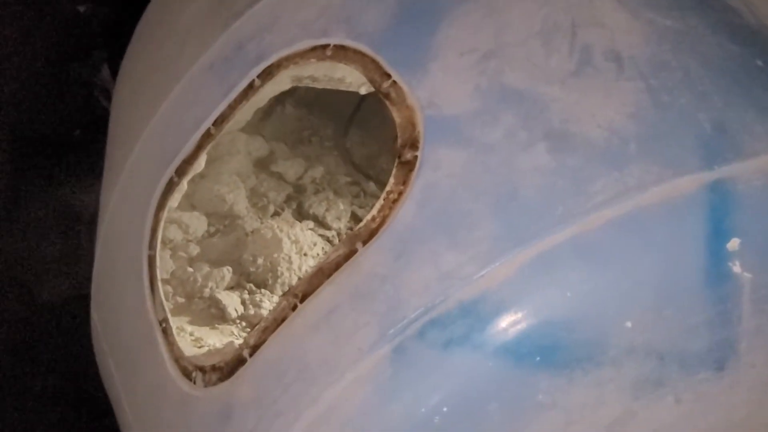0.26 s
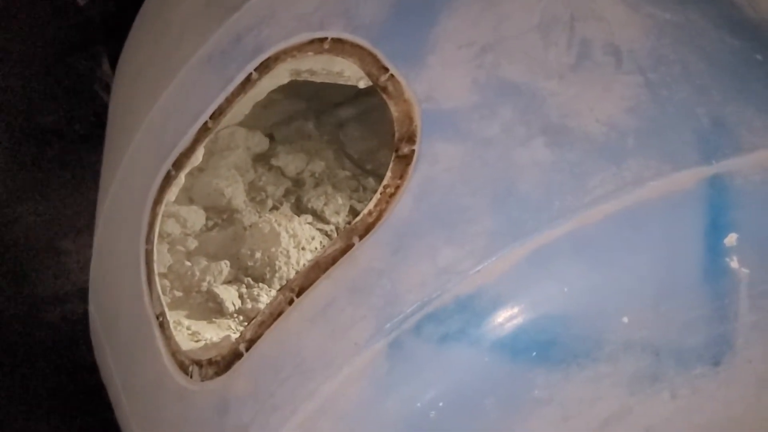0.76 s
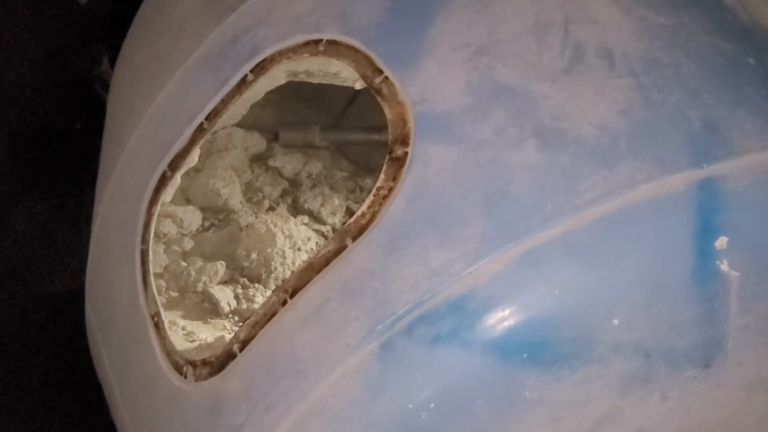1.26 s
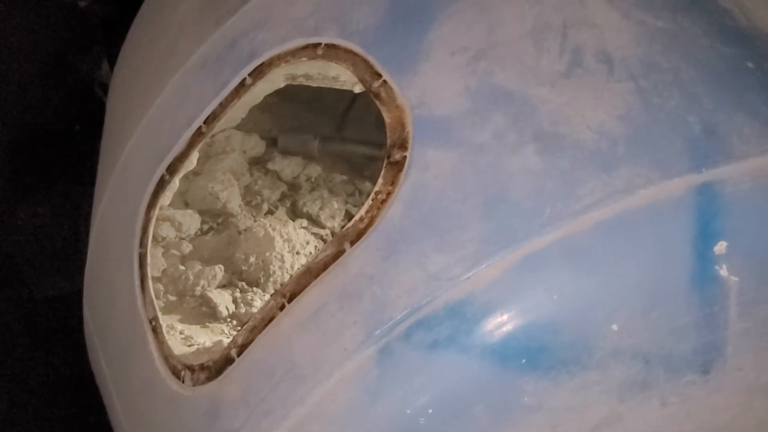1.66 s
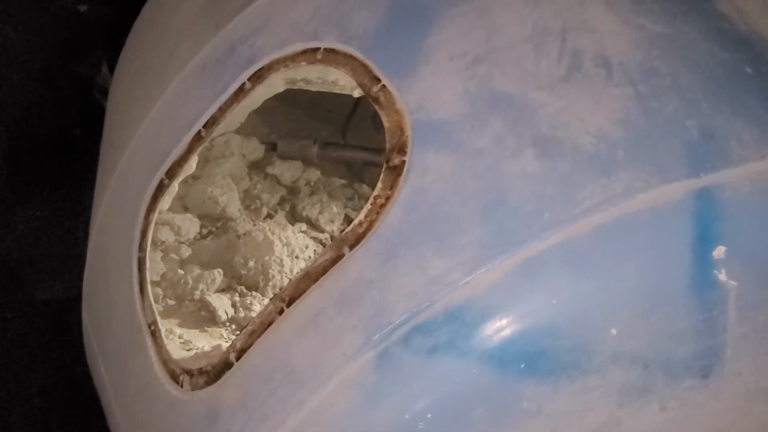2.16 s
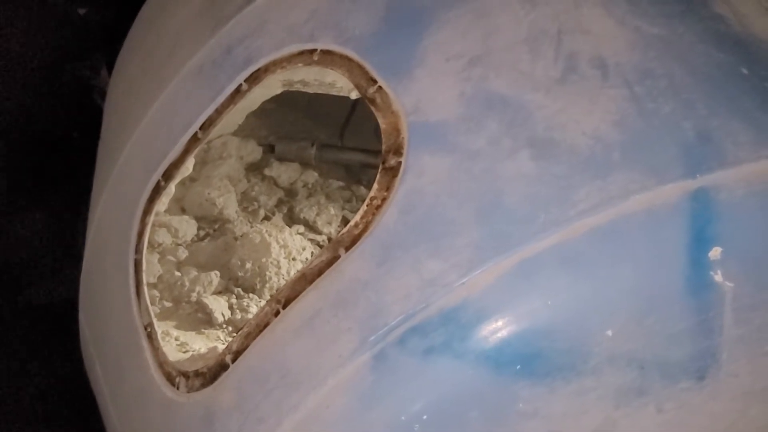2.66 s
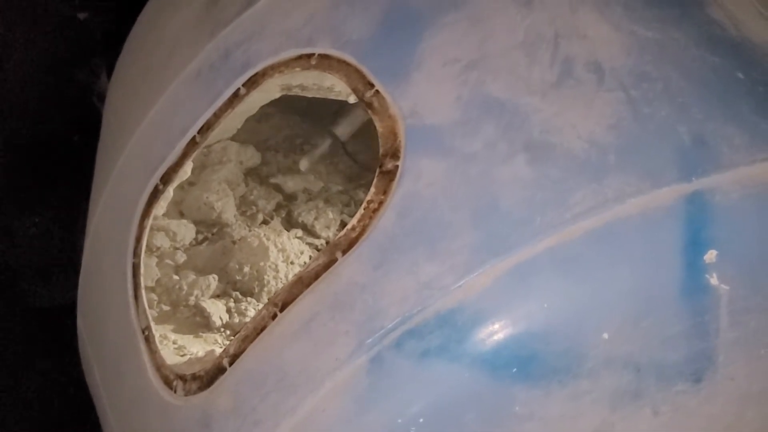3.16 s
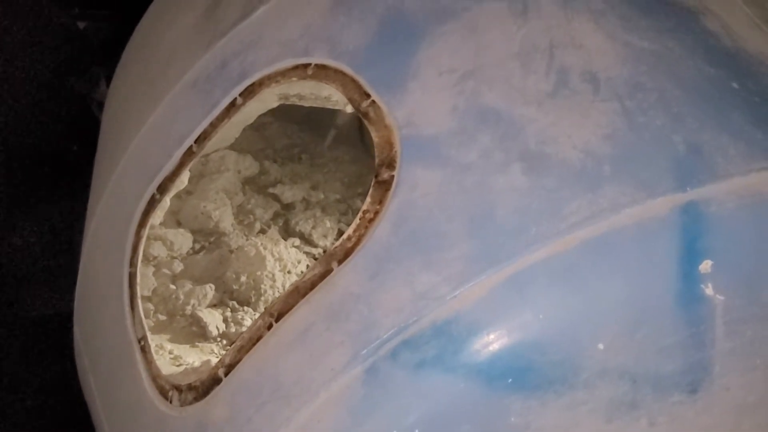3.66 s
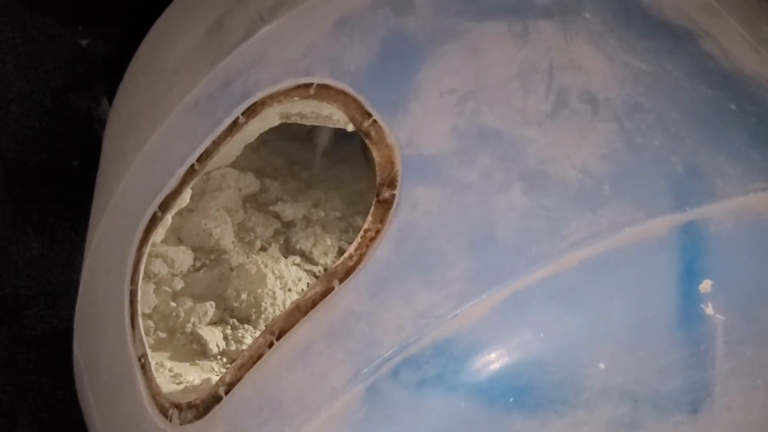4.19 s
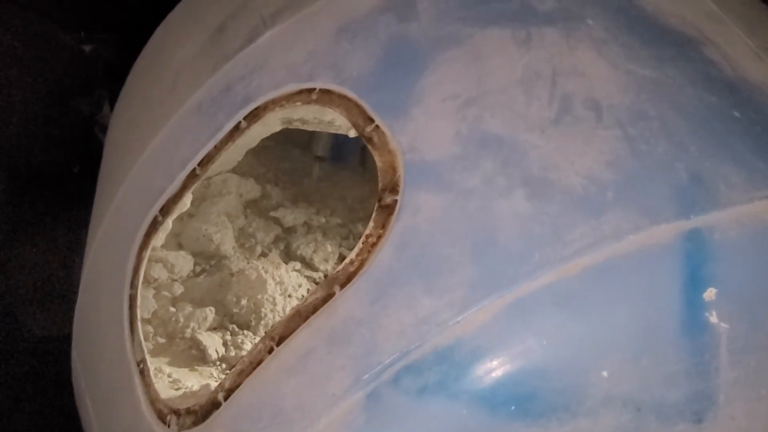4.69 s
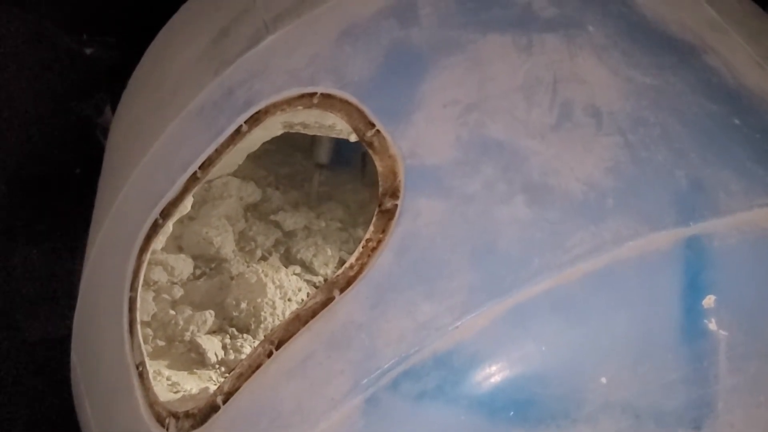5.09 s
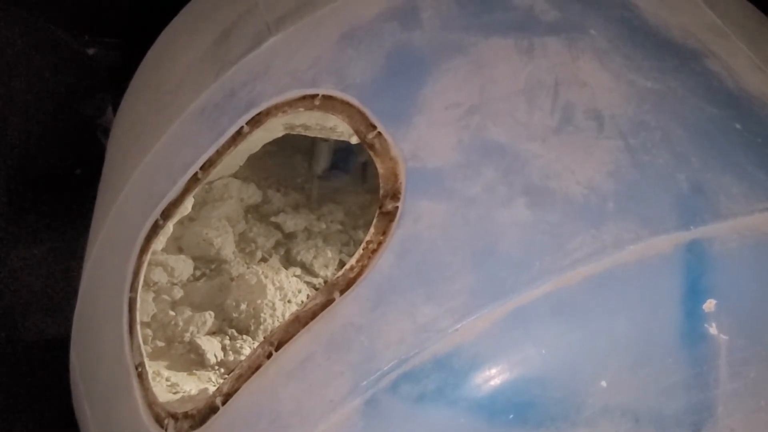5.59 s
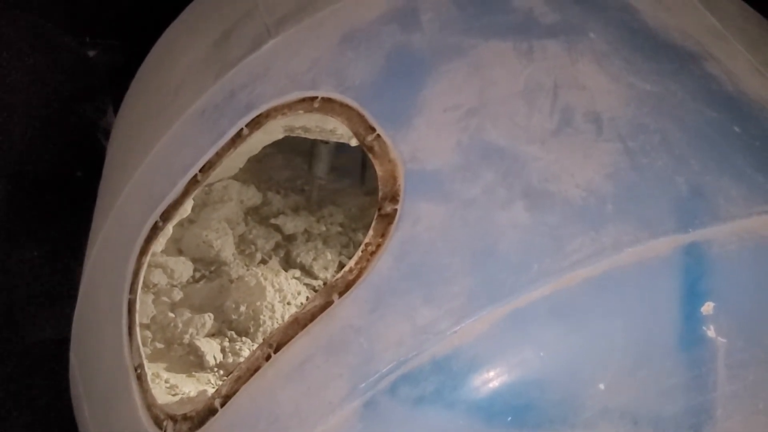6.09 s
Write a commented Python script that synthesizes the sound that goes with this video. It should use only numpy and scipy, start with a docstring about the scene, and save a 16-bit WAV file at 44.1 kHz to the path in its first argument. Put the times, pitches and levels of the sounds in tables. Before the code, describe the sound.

Close outside the opening of a hollow steel drum: sharp concrete cracks at about thirteen a second, bright chisel ringing, low drum boom and rushing exhaust air. The opening burst ends quickly, leaving engine rumble, hiss and a few light clacks. A scraping squawk leads into a long hammering run, then a short pause with falling bits, and hammering restarts right at the end.

```python
"""A pneumatic jackhammer chips hardened concrete in a mixer truck's steel drum, heard outside the hatch.
A run of blows is ending: each cracks and rings the chisel, the drum air booms, exhaust air rushes between.
Engine hum, rumble and a background hiss are low while the hammer works and swell slowly in the pauses.
The chisel skids with two short squawks into a long run at about thirteen blows a second; chips tick.
After another pause a third run begins. Impacts are coloured noise bursts; rings and booms decaying modes."""
import sys
import numpy as np
from scipy import signal
from scipy.fft import rfft, irfft, next_fast_len
from scipy.io import wavfile

SR = 44100
rng = np.random.default_rng(int(sys.argv[2]) if len(sys.argv) > 2 else 0)


def file_out(sig):
    """Save sig as 16-bit WAV at sys.argv[1]."""
    # one column per channel
    cols = np.atleast_2d(sig).T
    # limit, then scale
    lim = np.clip(cols, -1, 1)
    pcm = np.round(lim * 32767).astype(np.int16)
    wavfile.write(sys.argv[1], SR, pcm)


N = 279594
TIME = np.arange(N) / SR
RIGHT_LAG_S = 3 / SR   # sound from the hatch reaches the left side first

# hammer blows: start_s, force_db, sharpness (0 lingering crack, 1 short snap), chisel_ring_db
BLOWS = [(0.0455, 1, 0.85, -16.5), (0.114, 0, 0.87, -16), (0.191, -1.5, 0.89, -16.5), (0.2683, 1, 0.7, -13),
         (0.3391, -0.5, 0.93, -19), (0.4167, 0.5, 0.56, -11.5), (0.4953, -1.5, 0.81, -35),
         (2.7151, 0, 0.82, -24), (2.786, 1, .17, -15), (2.8531, 1.5, 0.52, -13), (2.921, 1, .65, -11.5),
         (2.993, 2, 0.74, -12), (3.0698, 2, 0.51, -15), (3.1414, 1, 0.18, -18.5), (3.207, 2, 0.57, -15),
         (3.2753, 0, .42, -17), (3.3444, -1.5, .1, -22), (3.4096, 1, 0.15, -23), (3.4753, 1, 0.26, -10.5),
         (3.5532, -0.5, 0.25, -23), (3.6155, 3.5, 0.42, -23), (3.68, 0.5, 0.57, -22),
         (3.757, -2.5, 0.83, -20), (3.8373, 2.5, 0.72, -14.5), (3.908, -9.5, .8, -21.5),
         (3.992, -2.5, 0.81, -25), (4.072, 0.5, 0.76, -18), (4.151, 2, 0.52, -15),
         (4.2239, -1.5, 0.73, -26), (4.2974, -1, 0.66, -22), (4.3765, -0.5, .65, -11.5),
         (4.4534, .5, 0.79, -25), (4.53, -.5, 0.91, -24), (4.6071, -.5, .3, -20), (4.6848, -1, 0.3, -27),
         (4.7606, 0, 0.39, -24), (4.8385, 0.5, 0.46, -36), (4.9165, 1, 0.33, -24), (4.9947, 1, 0.78, -24),
         (5.0704, 0, 0.47, -35), (5.1463, -0.5, 0.89, -28), (5.224, -2, .3, -35), (5.3002, .5, .5, -27),
         (5.3776, 1, 0.83, -26), (6.1762, -4.5, .64, -19.5), (6.2571, 1.5, 0.63, -13), (6.3324, 1, .2, -40)]
# how firmly the tip is bedded: time_s, bedded (0-1)
BEDDING = [(0, 0.17), (2.9, 0.6), (3.3, 0.3), (3.702, 0.52), (3.999, 1), (6.298, 1)]
# how much the concrete crumbles, as the level of its chips: time_s, level_db
CRUMBLING = [(0, -36), (2.7, -29), (3.7, -43), (4.35, -38), (4.8, -28.5), (6.34, -32)]
# chisel modes: freq_hz, loose_tip_db, bedded_tip_db, t60_s
CHISEL_MODES = [(4270, -3, -6, .2), (6265, -4, -8, .18), (7855, 3, 3, .17), (9695, -14, -.5, .22),
                (10015, -1, -14, .18), (10700, -10, -9, .13), (12010, -6, -2, .19), (12290, -3.5, -10, .18),
                (12800, -9, -11, .15), (14020, -15, -18, .15), (14440, -15, -19, .18),
                (15385, -12, -15, .14)]


def from_db(db):
    """Decibels to gain."""
    return 10 ** (np.asarray(db) / 20)


def to_db(gain):
    """A share of 0-1 to decibels, floored at -60 dB."""
    return 20 * np.log10(np.clip(gain, 1e-3, 1))


def decay(t, t60_s):
    """Exponential decay by 60 dB in t60_s."""
    return np.exp(-np.log(1000) * t / t60_s)


def rms_one(x):
    """Scale to rms 1."""
    return x / np.sqrt(np.mean(np.abs(x) ** 2) + 1e-20)


def in_time(rows, t=TIME):
    """The columns of a curve, read at times t."""
    s, *columns = np.transpose(rows)
    return [np.interp(t, s, c) for c in columns]


def at_hz(points, hz):
    """A spectrum read on a log-frequency axis."""
    point_hz, values = np.array(points)[:, 0], np.array(points)[:, 1]
    return np.interp(np.log(hz + 1), np.log(point_hz), values)


def add(out, sound, s):
    """Mix a stereo sound in at time s."""
    start = max(round(s * SR), 0)
    part = sound[:, :max(N - start, 0)]
    out[:, start:start + part.shape[1]] += part


def wander(width_hz, size):
    """Slow complex noise scaled to rms 1: the amplitude and phase of an unsteady tone."""
    steps = np.arange(0, size + 32, 32)
    hz = np.fft.fftfreq(len(steps), steps[1] / SR)
    draw = rng.standard_normal(len(hz)) + 1j * rng.standard_normal(len(hz))
    slow = rms_one(np.fft.ifft(draw / (1 + (hz / width_hz) ** 2)))
    return np.interp(np.arange(size), steps, slow)


def noise(spectrum, size=N, lag_s=RIGHT_LAG_S):
    """Coloured stereo noise of rms 1; a positive lag delays the right side."""
    # left-right likeness: freq_hz, likeness (0-1)
    likeness = [(40, 0.35), (180, 1), (350, 0.33), (1000, 0.5), (3000, 0.77), (5000, 0.56), (9000, 0.11),
                (15000, 0)]
    length = next_fast_len(size)
    hz = np.fft.rfftfreq(length, 1 / SR)
    mid, side = rfft(rng.standard_normal((2, length)))
    alike = np.clip(at_hz(likeness, hz), 0, 1)
    sides = np.sqrt(1 + alike) * mid + np.sqrt(1 - alike) * side * [[1], [-1]]
    sides[1] *= np.exp(-2j * np.pi * hz * lag_s)
    colour = from_db(at_hz(spectrum, hz)) * (hz > 20)
    return rms_one(irfft(sides * colour, length)[:, :size])


def trigger():
    """At every moment: seconds since the last press, seconds of pause so far, run's surge and hiss level."""
    # trigger held: pressed_s, released_s, first_air_surge_db, low_hiss_db
    runs = np.array([(-.5, .51, -4, -59.5), (2.626, 5.41, 9, -57.5), (6.094, 6.5, 7.5, -65)])
    pressed, released, surge_db, low_hiss_db = runs[np.searchsorted(runs[:, 0], TIME) - 1].T
    return TIME - pressed, np.maximum(TIME - released, 0), surge_db, low_hiss_db


def unsteady_tone(hz, waver, width_hz):
    """A line of rms 1 whose level and phase waver."""
    tone = np.exp(2j * np.pi * (hz * TIME + rng.random()))
    return rms_one((tone * (1 + waver * wander(width_hz, N))).real)


def whistle(hz, width_hz):
    """A narrow band of noise of rms 1, partly alike on the two sides."""
    tone, common = np.exp(2j * np.pi * hz * TIME), wander(width_hz, N)
    return rms_one(np.array([(tone * (common + 3.0 * wander(width_hz, N))).real for _ in range(2)]))


def engine_hum(swell_db, follows=0.12):
    """Wavering engine lines that follow a small share of the swell."""
    # engine tones: freq_hz, level_db
    engine_tones = [(54, -32.5), (86, -43.5), (112, -44.5), (226, -43), (253, -48), (355, -47), (533, -57),
                    (673, -58)]
    hum = sum(from_db(db) * unsteady_tone(hz, waver=0.51, width_hz=4.6) for hz, db in engine_tones)
    return hum * from_db(follows * (swell_db - swell_db.max()))


def background_hiss(pan_db=1.5):
    """A background hiss, stronger on the right, with faint narrow-band whistles."""
    # hiss spectrum: freq_hz, density_db_per_hz
    hiss_colour = [(300, -4), (1400, 11), (3000, 3), (5000, 2), (7300, -4), (9500, 1), (11700, 4.5),
                   (13500, -1.5), (15800, -3.5)]
    # whistles: freq_hz, width_hz, level_db
    whistles = [(691, 68, -5.5), (1229, 36, -11), (1370, 27, -11.5), (1510, 9.8, -17), (1957, 10, -12),
                (3010, 69, -13.5)]
    hiss = noise(hiss_colour, lag_s=-0.000296) * from_db(pan_db * np.array([[-1], [1]]))
    return hiss + sum(from_db(db) * whistle(hz, width_hz) for hz, width_hz, db in whistles)


def low_rumble(swell_db, pause_s):
    """Engine rumble swells in the pauses; the drum's own rumble dies away after each run."""
    # rumble spectrum: freq_hz, density_db_per_hz
    rumble_colour = [(15, -52), (25, -22), (36, 1), (58, -8), (173, -11.5), (190, -11), (214, -7.5),
                     (284, -12), (342, -4.5), (385, -18), (678, -17), (922, -24), (2010, -29.5),
                     (7000, -54), (9100, -78), (15400, -120)]
    lowest_engine_db, engine_follows = -43, 0.46
    drum_db, drum_fall_db_per_s = -34, 40
    engine_gain = from_db(lowest_engine_db + engine_follows * swell_db)
    drum_gain = from_db(drum_db - drum_fall_db_per_s * pause_s)
    return np.hypot(engine_gain, drum_gain) * noise(rumble_colour, lag_s=-0.00031)


def background():
    """Hum, rumble and hiss; a swell, low while the hammer works, grows with the log of each pause."""
    swell_db_per_doubling, first_step_s, smoothing_s = 4.5, 0.09, 0.026
    _, pause_s, _, low_hiss_db = trigger()
    lag = np.exp(-1 / (smoothing_s * SR))
    target_db = swell_db_per_doubling * np.log2(1 + pause_s / first_step_s)
    swell_db = signal.lfilter([1 - lag], [1, -lag], target_db)
    hum = engine_hum(swell_db)
    hiss = from_db(low_hiss_db + swell_db) * background_hiss()
    return (hum + hiss + low_rumble(swell_db, pause_s)) * from_db([[-.7], [.7]])


def exhaust(puff_db=2.0, flutter_db=2.5, flutter_hz=70.0):
    """Spent air surges near each trigger press, then rushes in fluttering puffs between blows until release."""
    # air spectrum: freq_hz, density_db_per_hz
    air_colour = [(30, -9), (60, 27.5), (140, 5.5), (250, 12.5), (400, 5.5), (700, 9.5), (1100, -1.5),
                  (1900, -4.5), (3200, 1), (4400, -1.5), (7000, -7.5), (9000, 2.5), (12000, 4), (15800, -3)]
    steady_db, valve_open_s, shut_db_per_s = -30.5, .014, 470
    surge_at_s, surge_length_s = 0.088, 0.064
    dust_follows = 0.27   # blown dust adds to the rush, dB per dB of crumbling
    s = np.array(BLOWS)[:, 0]
    stroke = np.interp(TIME, s, np.arange(len(s)))
    held_s, pause_s, surge_db, _ = trigger()
    crumbling_db, = in_time(CRUMBLING)
    surge = surge_db * np.exp(-((held_s - surge_at_s) / surge_length_s) ** 2)
    flow_db = steady_db + surge - shut_db_per_s * pause_s
    dust_db = dust_follows * (crumbling_db - crumbling_db.mean())
    puffs_db = puff_db * np.sin(2 * np.pi * stroke) + flutter_db * wander(flutter_hz, N).real
    valve = np.minimum(held_s / valve_open_s, 1)
    return valve * from_db(flow_db + dust_db + puffs_db) * noise(air_colour)


def chips(scatter_db=3.5, t60_s=0.035, size=3000):
    """Broken bits tick at random about the drum; after each run they thin out and land more softly."""
    # chip spectrum: freq_hz, density_db_per_hz
    chip_colour = [(300, -9), (1500, -5), (2400, -8), (3300, 5), (4500, 4.5), (6000, 5), (9000, -7),
                   (15800, -27)]
    chips_per_s, settle_s, settled_db, soften_s = 81, .2, -19.5, 0.04
    pause_s = trigger()[1]
    per_s = chips_per_s * np.exp(-pause_s / settle_s)
    db = in_time(CRUMBLING)[0] + settled_db * (1 - np.exp(-pause_s / soften_s))
    out, fade = np.zeros((2, N)), decay(TIME[:size], t60_s)
    for i in np.flatnonzero(rng.random(N) < per_s / SR):
        tick = noise(chip_colour, size=size) * fade
        add(out, tick * from_db(db[i] + scatter_db * rng.standard_normal()), i / SR)
    return out


def skid(rough_hz=70, fade_db=-8.5):
    """The tip slips over the concrete: a rough, fading squawk whose pitch sags midway."""
    # squawks: start_s, length_s, pitch_hz, sag_hz, level_db
    skids = [(2.67, 0.042, 1410, 50, -28), (2.707, 0.084, 825, 151, -18)]
    out = 0
    for s, length_s, hz, sag_hz, db in skids:
        slip = np.clip((TIME - s) / length_s, 0, 1)
        grip = 4 * slip * (1 - slip)
        tone = np.exp(2j * np.pi * np.cumsum(hz - sag_hz * grip) / SR)
        rough = np.array([0.31 + wander(rough_hz, N) for _ in range(2)])
        out = out + from_db(db + fade_db * slip) * np.sqrt(grip) * (tone * rough).real
    return out


def drum_boom(strokes, levels_db, modes, scatter_db, delay_s):
    """Each stroke puffs into the drum, whose low modes ring on into the next stroke."""
    bedded = in_time(BEDDING, strokes)[0]
    at, out = np.clip(((strokes + delay_s) * SR).astype(int), 0, N - 1), 0
    for hz, loose_db, bedded_db, t60 in modes:
        puffs = np.zeros(N) + 1e-18
        mode_db = loose_db + bedded * (bedded_db - loose_db)
        puffs[at] = from_db(levels_db + mode_db + scatter_db * rng.standard_normal(len(at)))
        r, w = decay(1 / SR, t60), 2 * np.pi * hz / SR
        rung = signal.lfilter([0, np.sin(w)], [1, -2 * r * np.cos(w), r * r], puffs)
        # a mode takes a few cycles to build up
        build_up = signal.butter(1, [hz * .75, hz / .75], "band", fs=SR, output="sos")
        out = out + signal.sosfilt(build_up, rung)
    return out


def drum_air(s):
    """The drum's air modes boom and its deep modes thud under the blows."""
    # air modes: freq_hz, loose_tip_db, bedded_tip_db, t60_s
    air_modes = [(107.7, -1, 4, 0.42), (169.23, -1, -1, 0.79), (210, 1, -9, 0.34), (234.3, -16, 0, 0.35),
                 (275.5, -12, -14, 0.27), (339, -5.5, -10.5, .2), (374.5, -24, -12, 0.19)]
    # deep modes: freq_hz, loose_tip_db, bedded_tip_db, t60_s
    deep_modes = [(49.75, 3.5, 1, 0.59), (74.9, 5.5, -9, 0.23)]
    # levels in the drum: time_s, boom_db, thud_db
    boom_levels = [(0, -25, -23), (.4, -24.5, -28), (2.7, -30, -29), (3.05, -27.5, -20), (3.35, -22, -18.5),
                   (4.2, -22, -22), (5.35, -26, -24), (6.3, -22.5, -22)]
    strokes = np.r_[0, s]   # the drum is already ringing at the start
    boom_db, thud_db = in_time(boom_levels, strokes)
    boom = drum_boom(strokes, boom_db, air_modes, scatter_db=1.5, delay_s=0.0012)
    return boom + drum_boom(strokes, thud_db, deep_modes, scatter_db=3.2, delay_s=0.00033)


def drum_burst(spectrum, direct_db, direct_t60, patchy_db, size=12000, rise_s=0.00092):
    """One impact as it leaves the hatch: a short direct burst, then reflections that die band by band."""
    # ring-down of the drum: freq_hz, t60_s
    drum_t60 = [(200, 0.27), (600, 0.065), (1500, 0.07), (4000, 0.17), (9000, 0.081), (15000, 0.096)]
    t, hz = TIME[:size], np.fft.rfftfreq(size, 1 / SR)
    patches = np.c_[np.geomspace(200, 16000, 30), patchy_db * rng.standard_normal(30)]
    source = rfft(noise(spectrum, size=size)) * from_db(at_hz(patches, hz))
    centres = np.array(drum_t60)[:, 0]
    direct = from_db(direct_db) * decay(t, direct_t60)
    out = 0
    for (_, t60), share in zip(drum_t60, np.eye(len(centres))):
        band = irfft(source * at_hz(np.c_[centres, share], hz), size)
        out = out + band * (decay(t, t60) + direct)
    return out * (1 - np.exp(-t / rise_s)) / (1 + from_db(direct_db))


def impacts(times, levels_db, spectrum, direct_db, direct_t60, fresh, patchy_db):
    """Impacts share the drum's echo pattern in part; the fresh rest is drawn anew for each impact."""
    out, fresh = np.zeros((2, N)), np.clip(fresh, 0, 1)
    pattern = drum_burst(spectrum, direct_db, direct_t60, 0)
    for s, db in zip(times, levels_db):
        own = drum_burst(spectrum, direct_db, direct_t60, patchy_db)
        add(out, from_db(db) * (np.sqrt(1 - fresh) * pattern + np.sqrt(fresh) * own), s)
    return out


def struck(times, levels_db, modes, scatter_db, split_hz, choke_s, alike, size=5000):
    """Steel modes, each a cluster of beating partials, ring until the tool's weight chokes them."""
    out, t, alike = np.zeros((2, N)), TIME[:size].astype(np.float32), np.clip(alike, 0, 1)
    for s, blow_db, bedded in zip(times, levels_db, in_time(BEDDING, times)[0]):
        for db, (hz, loose_db, bedded_db, t60) in zip(blow_db, modes):
            partial_hz = hz + split_hz * rng.laplace(size=(5, 1))
            turn = (2 * np.pi * partial_hz).astype(np.float32) * t
            common, *own = np.exp(2j * np.pi * rng.random((3, 5)))
            sides = np.sqrt(alike) * common + np.sqrt(1 - alike) * np.array(own)
            sides[1] *= np.exp(-2j * np.pi * hz * RIGHT_LAG_S)
            tone = rms_one(sides.real @ np.cos(turn) - sides.imag @ np.sin(turn))
            level_db = db + loose_db + bedded * (bedded_db - loose_db) + scatter_db * rng.standard_normal()
            add(out, tone * from_db(level_db) * decay(t, t60) * np.exp(-(t / choke_s) ** 2), s)
    return out


def cracks(s, force_db, sharpness, bedded):
    """Concrete fractures: sharpness splits each blow between lingering crack and snap; bedding muffles it."""
    # crack spectrum: freq_hz, density_db_per_hz
    crack_colour = [(300, -45), (1500, -21), (3000, -12.5), (4300, 1.5), (5300, -3), (7100, -5.5),
                    (8500, 1), (10500, -1.5), (12500, 7), (13500, -7), (15700, -1)]
    level_db = force_db - 1.96 * bedded
    crack = impacts(s, -8.5 + level_db + to_db(1 - sharpness), crack_colour, direct_db=-25.0,
                    direct_t60=0.07, fresh=0.41, patchy_db=4.0)
    snap = impacts(s, -2.5 + level_db + to_db(sharpness), crack_colour, direct_db=21.0,
                   direct_t60=0.027, fresh=1.0, patchy_db=2.5)
    return crack + snap


def crunch_and_shell(s, force_db, bedded):
    """Crushed concrete crunches and tool body and drum shell ring, growing faster than the force."""
    # crunch spectrum: freq_hz, density_db_per_hz
    crunch_colour = [(100, -31), (250, 7), (500, 3), (800, 4), (1200, -1), (2000, -6), (3200, -0.5),
                     (5000, -14), (9000, -11), (16000, -40)]
    # tool body and drum shell: freq_hz, loose_tip_db, bedded_tip_db, t60_s
    shell_modes = [(476, -2, -4.5, 0.11), (575.6, -8, 1.5, 0.2), (739, -8.5, -4.5, 0.24),
                   (1110, -2, -17, 0.047), (1384, -23, -2, 0.11), (2080, -1, -2, 0.07),
                   (2950, -15, 2.5, 0.1)]
    level_db = 1.7 * force_db - 4 * bedded
    crunch = impacts(s, -14.5 + level_db, crunch_colour, direct_db=7.5, direct_t60=0.025, fresh=0.73,
                     patchy_db=3.0)
    shell_db = np.outer(-31.5 + level_db, np.ones(len(shell_modes)))
    return crunch + struck(s, shell_db, shell_modes, scatter_db=2.0, split_hz=23.2, choke_s=0.15,
                           alike=0.12)


def chisel_ring(s, ring_db, lower_follows=0.39):
    """The chisel's steel modes ring; low and middle ones follow each blow's ring only in part."""
    # lower chisel modes: time_s, low_db, middle_db
    lower_ring = [(0, -32, -23), (.34, -37, -25), (.42, -21, -18), (2.8, -23, -26), (3.07, -25.5, -17),
                  (3.2, -24, -30), (3.61, -29, -35), (3.68, -27, -14.5), (4.05, -30, -20.5),
                  (4.4, -30, -33), (4.85, -32, -25), (6.3, -24, -26)]
    # low, middle and high anchors of the ring levels: freq_hz
    ring_hz = [7860, 9850, 12100]
    low_db, middle_db = in_time(lower_ring, s) + lower_follows * (ring_db - ring_db.mean())
    mode_hz = np.array(CHISEL_MODES)[:, 0]
    levels_db = [np.interp(mode_hz, ring_hz, blow) for blow in zip(low_db, middle_db, ring_db)]
    return struck(s, levels_db, CHISEL_MODES, scatter_db=3.0, split_hz=36.0, choke_s=0.057, alike=0.63)


def rebounds():
    """The chisel bounces back or touches lightly: a clack and a short, quickly choked ring."""
    # rebounds and light knocks: start_s, relative_clack_db, relative_ring_db
    knocks = [(0.055, -12, -27), (0.517, -19, -33), (0.831, -32.5, -63), (0.916, -29, -59),
              (0.943, -25.5, -52), (2.691, -12, -29), (2.8644, -20, -21), (2.895, -24, -23),
              (2.9354, -31, -23), (2.9613, -29, -22), (3.034, -31, -23), (3.6606, -27, -26),
              (4.0834, -30, -29), (5.5107, -24.5, -43), (5.6705, -32, -60), (6.1582, -12, -24)]
    # clack spectrum: freq_hz, density_db_per_hz
    knock_colour = [(300, -17), (900, -7), (1400, 8.5), (2300, -1), (3500, 0.5), (4200, 14.5), (5200, 0),
                    (6500, -6), (8000, -1), (10300, 1), (12000, -2), (15700, -4)]
    s, clack_db, ring_db = np.transpose(knocks)
    clack = impacts(s, clack_db - 8.5, knock_colour, direct_db=10.0, direct_t60=0.036, fresh=0.67,
                    patchy_db=9.0)
    levels_db = np.outer(ring_db - 0.5, np.ones(len(CHISEL_MODES)))
    return clack + struck(s, levels_db, CHISEL_MODES, scatter_db=4.5, split_hz=80.0, choke_s=0.0076,
                          alike=0.31)


def hammer():
    """Blows break the concrete and excite chisel, shell and drum air; each group is panned slightly."""
    s, force_db, sharpness, ring_db = np.transpose(BLOWS)
    bedded, = in_time(BEDDING, s)
    crack = cracks(s, force_db, sharpness, bedded)
    body = crunch_and_shell(s, force_db, bedded)
    ring = chisel_ring(s, ring_db)
    air = drum_air(s)
    tip = crack + ring + rebounds()
    return tip * from_db([[-1.3], [1.3]]) + body * from_db([[.9], [-.9]]) + air * from_db([[-.4], [.4]])


def scene():
    """The hammer, its chips, exhaust and skids over the engine and the hiss."""
    return hammer() + chips() + exhaust() + skid() + background()


def record(dry, top=1.7, low_cut_hz=51.7, high_cut_hz=15750):
    """The deepest bass is dropped, the highest peaks are rounded and the top is cut."""
    lean = signal.sosfilt(signal.butter(4, low_cut_hz, "high", fs=SR, output="sos"), dry)
    rounded = top * np.tanh(lean / top)
    return signal.sosfiltfilt(signal.ellip(10, .05, 60, high_cut_hz, fs=SR, output="sos"), rounded)


dry = scene()
out = record(dry)
file_out(out)
```